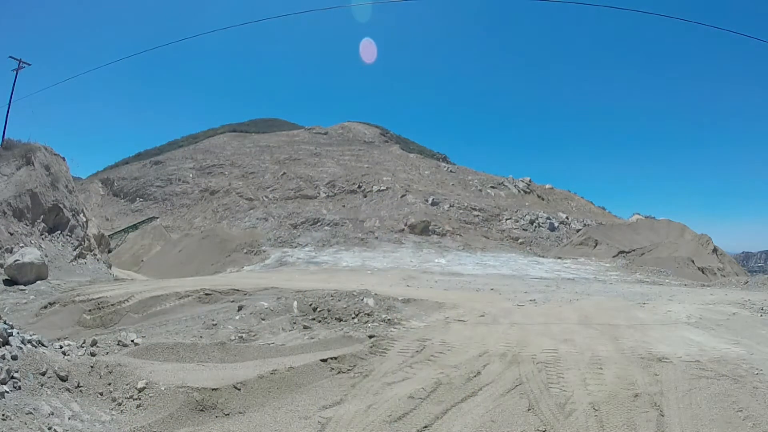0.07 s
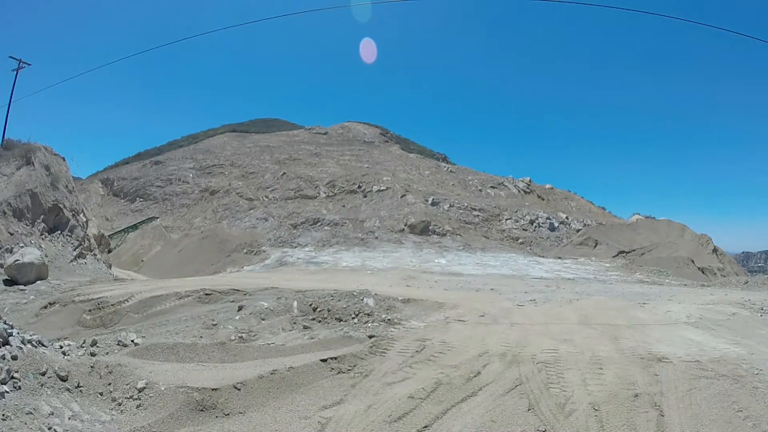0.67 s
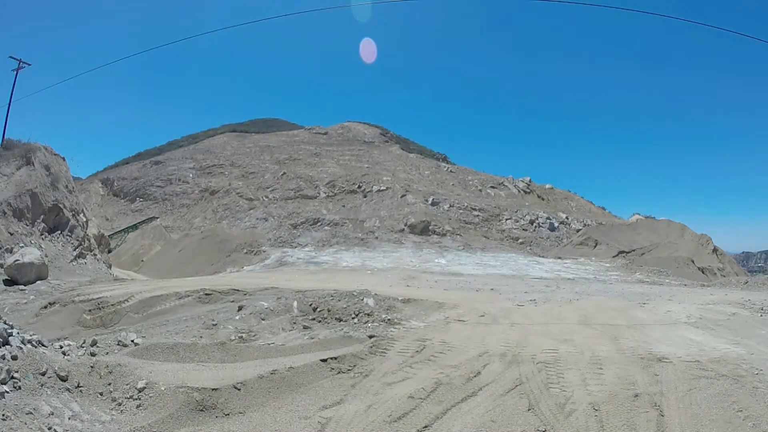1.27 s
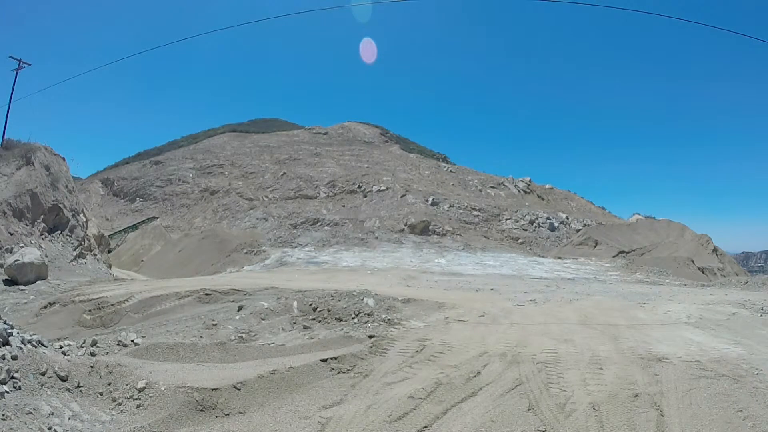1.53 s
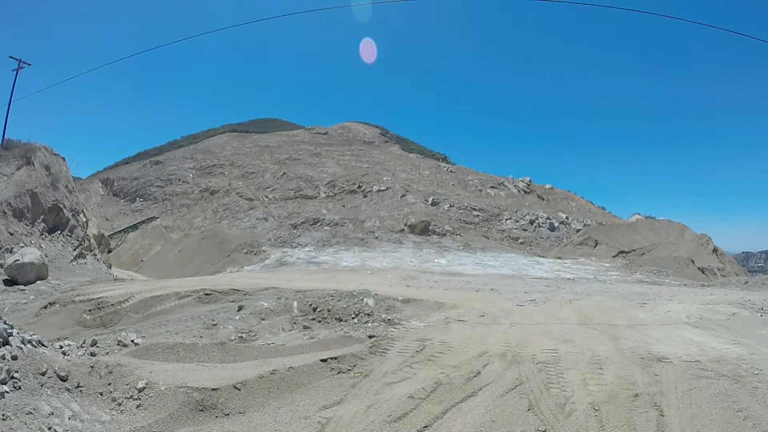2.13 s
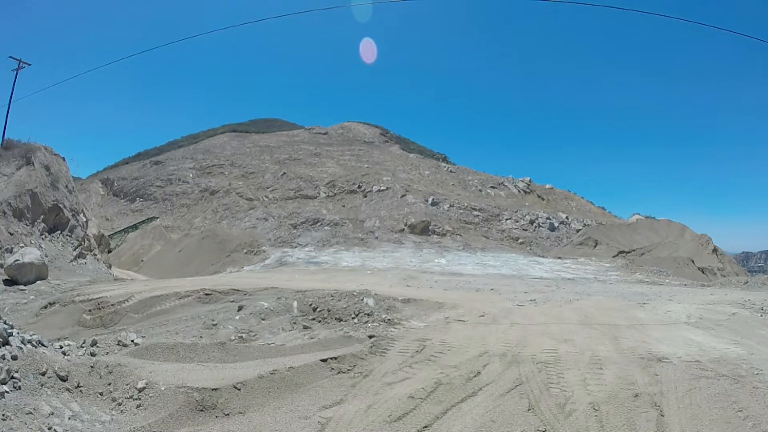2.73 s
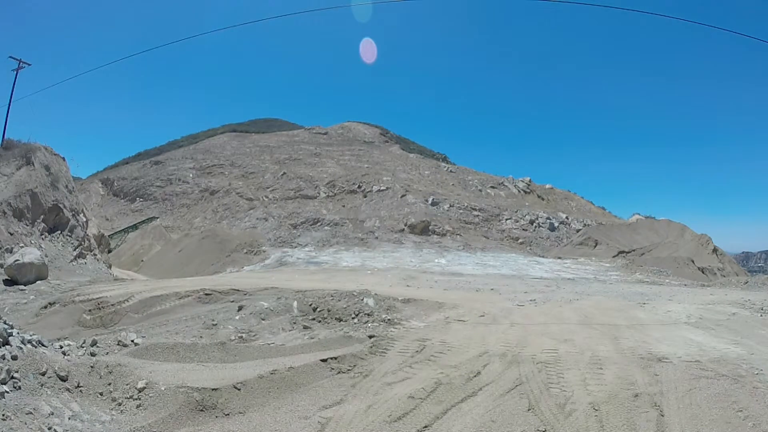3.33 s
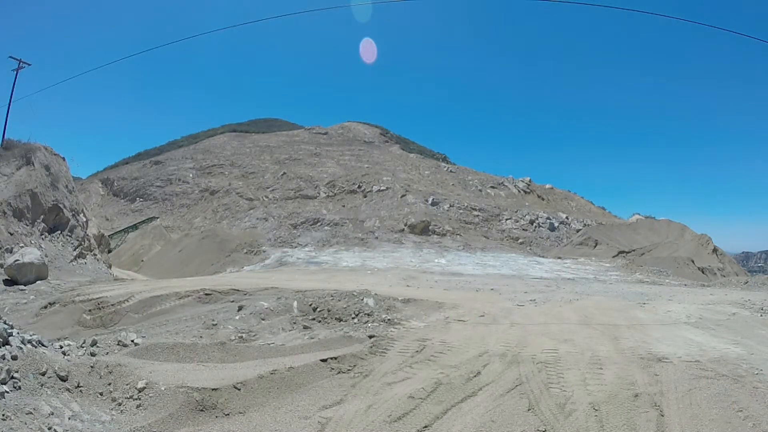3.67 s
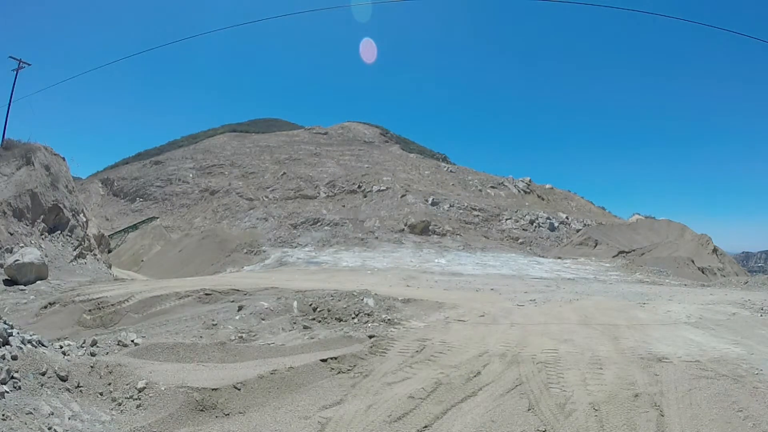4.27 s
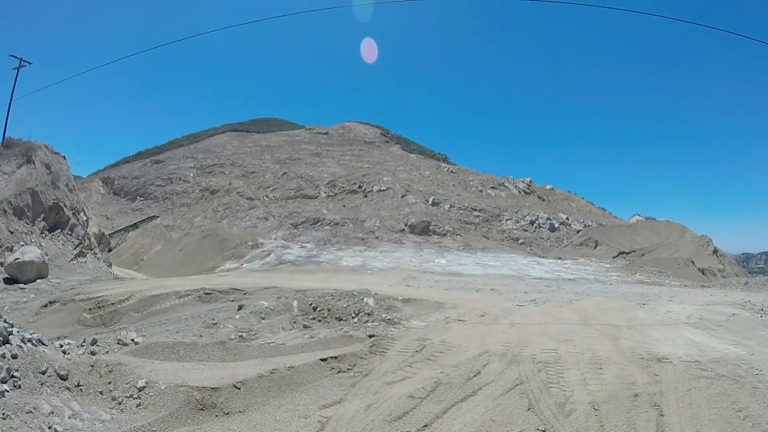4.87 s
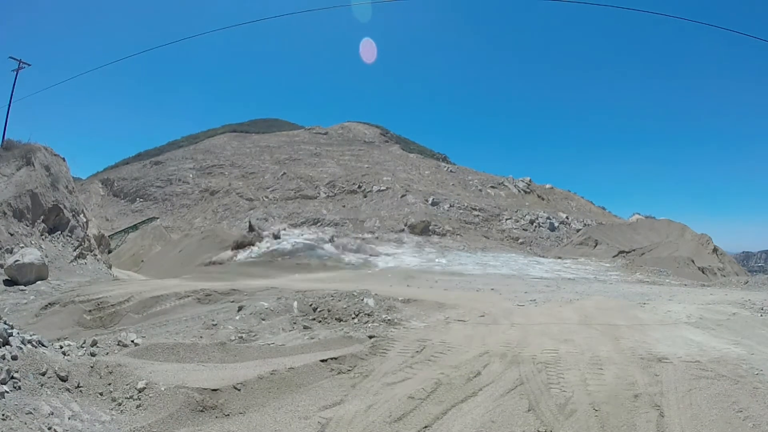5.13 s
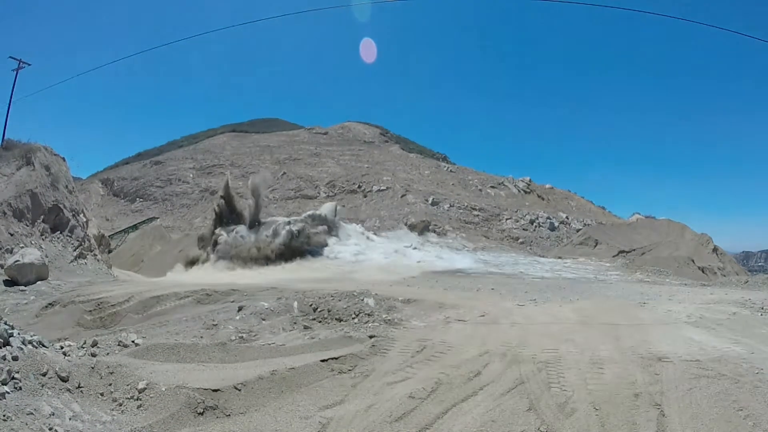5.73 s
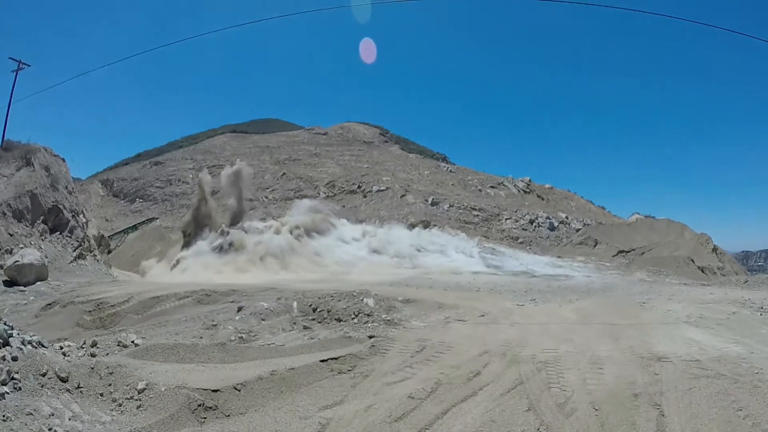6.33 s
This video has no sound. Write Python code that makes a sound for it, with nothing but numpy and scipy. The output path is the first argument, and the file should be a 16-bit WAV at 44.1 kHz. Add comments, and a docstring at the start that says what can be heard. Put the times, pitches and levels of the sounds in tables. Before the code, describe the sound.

After faint outdoor wind, a quarry blast goes off in quick crackling bursts, joined by muffled booms, low rumbling and falling stones.

```python
"""A quarry blast, heard from across the pit through a small camera in a case. First there is only a quiet
breeze. From about 4.2 s, detonators on the surface crack, six rows a second; each sharp jump in air
pressure sets the case ringing, and the pit walls echo. From about 4.8 s, while the cracks go on, the rock
face heaves and buried charges thud. A deep rumble rolls on to the end, with boulders and stones shaken
loose by each charge."""
import sys
import numpy as np
from scipy import signal
from scipy.fft import rfft, irfft, next_fast_len
from scipy.io import wavfile
from scipy.ndimage import uniform_filter1d

SR = 44100
rng = np.random.default_rng(int(sys.argv[2]) if len(sys.argv) > 2 else 0)


def unload_audio(sound):
    """Save the sound as a 16-bit wav file, at the path given as the first command line argument."""
    columns = np.transpose(np.atleast_2d(sound))
    # keep every value between -1 and 1, then stretch to whole-number steps
    steps = np.round(np.clip(columns, -1, 1) * 32767)
    wavfile.write(sys.argv[1], SR, steps.astype(np.int16))


N = 281799
T = np.arange(N) / SR
HEAVE_START_S, HEAVE_RISE_S = 4.778, 0.032

# Levels in all tables are relative: the code shifts them up or down as it mixes.
# The buried charges. Each row: start in seconds, level of the dull thud in dB, of the sharp bite in dB.
CHARGES = [(4.8409, -25.5, -52), (4.8516, -12, -21), (4.8607, -20.5, -25), (4.8748, -11, -23),
           (4.9181, -14, -19), (4.9364, -22.5, -48), (4.9562, -35, -59), (4.967, -23.5, -56),
           (5.0423, -17, -21), (5.0731, -11, -17.5), (5.0813, -31, -42), (5.095, -21.5, -26),
           (5.119, -17.5, -26.5), (5.1286, -16.5, -28), (5.1539, -21, -32), (5.2201, -17.5, -25),
           (5.2851, -27, -59), (5.362, -24, -88), (5.4100, -21.5, -35), (5.4459, -23, -32),
           (5.4651, -27.5, -37), (5.5736, -19.5, -43), (5.651, -30.5, -55), (5.7598, -22, -38),
           (5.8926, -17, -25), (6.095, -11, -29), (6.1006, -15, -26), (6.1167, -27, -48),
           (6.164, -29.5, -59), (6.2611, -18.5, -27), (6.29, -26, -55), (6.3265, -16.5, -33)]
# How strongly the boulders tumble. Each row: time in seconds, level in dB.
TUMBLE_LEVEL = [(4.8, -33), (4.874, -26.5), (5.024, -30), (5.078, -33), (5.148, -31.5), (5.698, -33),
                (5.76, -28.5), (5.826, -39.5), (5.902, -24.5), (6.004, -35), (6.11, -23.5), (6.164, -29),
                (6.288, -22.5), (6.39, -38)]
# The tone of breaking stone. Each row: frequency in Hz, level in dB.
STONE_SPECTRUM = [(500, -9), (1000, 19), (1280, 20), (1600, 20), (2350, 16.5), (3000, -12), (5000, -29),
                  (9000, -128), (15000, -80)]
# The tone of the echo from the pit walls. Each row: frequency in Hz, level in dB.
WALL_SPECTRUM = [(200, -19), (950, -7), (1240, 10.5), (1600, 3.5), (2000, -2.5), (3000, -7), (3550, -3.5),
                 (4000, -3), (4500, -4.5), (5200, -24), (5850, -6.5), (6700, -22), (14000, -47)]


def detonators(snap_db=-3.46, ring_db=-1.0):
    """Each shock gives a bright snap and a slower ring of the case; hard shocks make the case sing."""
    # Four sets of resonances. Each row: frequency in Hz, width in Hz, level in dB.
    bare_modes = [(4140, 690, 5), (7900, 550, -6), (9700, 890, -10), (13400, 1400, -18.5)]  # the shock itself
    quick_modes = [(1985, 1060, 2.5), (2810, 130, -1), (3327, 270, 0), (4590, 420, 6), (5440, 370, -0.5),
                   (5760, 186, 4.5), (7150, 490, -14.5), (10130, 620, -15.5)]  # the snap of the case
    slow_modes = [(1213, 100, -1.5), (1326, 71, 5), (1551, 142, 3), (1900, 1900, -10.5), (444, 1040, -8.5)]  # its ring
    singing_modes = [(1219, 81, 6.5), (1410, 91, -2), (2185, 140, -8), (2740, 60, 1.5), (3400, 170, -7.5),
                     (5875, 220, -2.5)]  # its clear tones
    hard_db, tone_growth, tone_limit_db, fade_db_per_s = -19, 3, -16.5, 11
    out = np.zeros(N)
    for start, snap, ring, bare_db in firing_order():
        shock = pressure_front(scatter=0.6, scatter_s=0.00061, bounce=0.11)
        bare = from_db(bare_db) * resonate(shock, bare_modes)
        add(out, start, snap + snap_db, lowpass(resonate(shock, quick_modes), hz=9900, order=3) + bare)
        push = pressure_front(scatter=0.56, scatter_s=0.0008, bounce=0.24)
        case = lowpass(resonate(push, slow_modes), hz=2340, order=3)
        add(out, start, ring + ring_db, case - 0.44 * lowpass(case, hz=600, order=1))  # thin the bass
        # The clear tones grow faster than the ring, up to a limit, and fade once the face heaves.
        tones = lowpass(resonate(shock, singing_modes), hz=6820, order=4)
        tone_db = min(hard_db + tone_growth * (ring - hard_db), tone_limit_db)
        fade_db = fade_db_per_s * max(start - HEAVE_START_S, 0)
        add(out, start, tone_db + ring_db - fade_db, tones)
    return out


def firing_order(jitter_s=0.0007, snap_spread_db=3, ring_spread_db=1.5):
    """Lists every crack; a row of detonators fires as a quick, nearly even run."""
    # Cracks placed one by one: a few that stand out, and the first two cracks of the row near 4.70 s. Each row:
    # start in seconds, then snap, ring and share of bare shock in dB.
    single_cracks = [(4.2354, -27.5, -32, -8), (4.4002, -20, -20, -7.5), (4.703, -29, -24.5, -9),
                     (4.7090, -22, -22, -9), (5.0426, -17.5, -20, -1.5), (5.5755, -22, -25, -11),
                     (6.0685, -24, -30, -7)]
    # Runs of cracks. Each row: start and length in seconds, number of cracks, snap and ring in dB,
    # then how much the snap and the ring grow from first crack to last in dB.
    rows = [(4.3778, 0.012, 4, -25, -22, 1, -2), (4.5481, .0418, 6, -18, -16.5, 4, 2),
            (4.7148, .0251, 4, -24.5, -18.5, 17.5, 1), (4.8731, .0428, 6, -24.5, -26, -4, 2),
            (5.033, 0.041, 6, -31.5, -28.5, 3.5, -2), (5.204, 0.046, 7, -30, -31.5, 6, 8),
            (5.3734, 0.047, 8, -35.5, -34, 14.5, 21), (5.533, 0.068, 9, -29, -27.5, 1.5, 6.5),
            (5.687, .0605, 9, -28.5, -26, 9, 6), (5.8523, 0.073, 9, -27.5, -25.5, 9.5, 12),
            (6.0215, 0.064, 9, -26.5, -26.5, 4.5, 0), (6.1968, 0.072, 10, -35, -32, 9.5, 12),
            (6.356, 0.033, 5, -37.5, -37, 19, 4)]
    cracks = list(single_cracks)
    for start, length, count, snap, ring, snap_growth, ring_growth in rows:
        bare_db = -12.5 + 2.5 * (start - rows[0][0])  # later rows sound crisper
        chance = rng.standard_normal(size=(20, 3))
        for along, (late, harder, fuller) in zip(np.linspace(0, 1, round(count)), chance):
            crack_s = start + along * length + jitter_s * late * (along > 0)
            snap_db = snap + snap_growth * (along - .5) + snap_spread_db * harder
            ring_db = ring + ring_growth * (along - .5) + ring_spread_db * fuller
            cracks.append((crack_s, snap_db, ring_db, bare_db))
    return cracks


def charges(thud_db=-0.62, bite_db=-5.0, shove_hz=74.3):
    """Rock muffles each charge; the escaping gas bites, then shoves the air in one heavy swing."""
    # Two sets of resonances. Each row: frequency in Hz, width in Hz, level in dB.
    thud_modes = [(255, 70, 7), (650, 170, -0.5), (1263, 156, 2), (1780, 147, 3), (2135, 260, -0.5)]  # the charge under the rock
    bite_modes = [(2500, 150, 8), (2750, 330, 1.5), (3220, 300, -7.5), (4350, 1500, -43), (8250, 3300, -37)]  # the gas bursting through
    out, t = np.zeros(N), T[:SR // 8]
    shove = np.cos(2 * np.pi * shove_hz * t) * np.exp(-t / 0.0085) * (1 - np.exp(-t / 0.0015))
    for start, thud, bite in CHARGES:
        shock = pressure_front(scatter=1.0, scatter_s=0.0015, bounce=0.024)
        add(out, start, thud + thud_db, lowpass(resonate(shock, thud_modes), hz=2410, order=6))
        add(out, start, bite + bite_db, lowpass(resonate(shock, bite_modes), hz=5700, order=2))
        add(out, start, thud, shove)
    return out


def pressure_front(scatter, scatter_s, bounce):
    """A jump in air pressure, its bounce off the ground and its dying scatter off loose stones."""
    t = T[:SR // 20]
    scattered = rms_one(rng.standard_normal(len(t)) * t * np.exp(-t / scatter_s))
    pulse = scatter * scattered / np.sqrt(len(t))
    pulse[0] += 1
    pulse[int(rng.uniform(.0004, .0009) * SR)] += bounce
    return pulse


def rumble(swell_db=2.5, boom_db=0.5):
    """The heaving rock face pumps the air in deep swells, with a boom above them."""
    # The tone of the swell and of the boom. Each row: frequency in Hz, level in dB.
    swell_spectrum = [(16, -13), (22, 6), (32, -30), (44, -9), (56, 4.5), (70, -9), (90, -37), (150, -43)]
    boom_spectrum = [(55, -17.5), (74, -9), (91, 2), (110, -10.5), (135, -20.5), (220, -41)]
    # How they rise and fall. Each row: time in seconds, level in dB.
    swell_level = [(4.78, -35), (4.828, -21.5), (4.918, -18.5), (4.95, -26), (5.07, -15), (5.11, -31),
                   (5.222, -22), (5.25, -30.5), (5.438, -21.5), (5.46, -32), (5.578, -17), (5.69, -32),
                   (5.748, -13.5), (5.928, -28.5), (6.08, -12.5), (6.146, -26.5), (6.344, -19), (6.39, -25)]
    boom_level = [(4.78, -22), (4.81, -22), (4.868, -11), (4.994, -37), (5.142, -18.5), (5.2, -32),
                  (5.228, -14.5), (5.29, -41), (5.336, -22.5), (5.55, -25.5), (5.572, -22.5),
                  (5.788, -25.5), (5.842, -30), (5.864, -23), (6.124, -17.5), (6.152, -24), (6.348, -19.5),
                  (6.39, -27)]
    swell = from_db(swell_db) * gain_curve(swell_level) * rolling(swell_spectrum, evenness=0.64)
    boom = from_db(boom_db) * gain_curve(boom_level) * rolling(boom_spectrum, evenness=0.53)
    return heaving() * (swell + boom)


def boulders(heave_db=-2.0, shaken_db=-6.5):
    """Boulders tumble as the face moves and after each charge."""
    # The tone of tumbling boulders. Each row: frequency in Hz, level in dB.
    tumble_spectrum = [(135, -46), (170, -10), (209, 0.5), (256, -10), (325, -10.5), (385, -19),
                       (470, -20.5), (590, -18.5), (900, -27.5), (1400, -55)]
    heaved = from_db(heave_db) * heaving() * gain_curve(TUMBLE_LEVEL)
    shaken = from_db(shaken_db) * shaking(settle_s=0.015)
    return np.hypot(heaved, shaken) * rolling(tumble_spectrum, evenness=0.45)


def gravel(knocks_per_s=400, size_db=6.0, heave_db=-48.5, shaken_db=-22.5, tumble_db=-31.0, growth=1.7):
    """Many small knocks of breaking stone; they swell faster than the boulders that grind them."""
    knocks = (rng.random(N) < knocks_per_s / SR) * rng.choice([-1, 1], N)
    sizes = from_db(size_db * np.minimum(rng.exponential(1, N), 3))
    grinding = from_db(heave_db) * heaving() * (gain_curve(TUMBLE_LEVEL) / from_db(tumble_db)) ** growth
    shaken = from_db(shaken_db) * shaking(settle_s=0.03)
    return np.hypot(grinding, shaken) * colour(knocks * sizes, STONE_SPECTRUM)


def heaving():
    """The rock face gathers speed, from 0 (at rest) to 1 (in full motion)."""
    return np.clip((T - HEAVE_START_S) / HEAVE_RISE_S, 0, 1) ** 2


def shaking(settle_s, rise_s=0.0012):
    """How much the loose stone moves: each charge jolts it, and then it settles."""
    jolts = np.zeros(N)
    for start, thud, _ in CHARGES:
        jolts[round(start * SR)] += from_db(thud) ** 2
    energy = signal.lfilter([1], [1, -np.exp(-2 / (settle_s * SR))], jolts + 1e-18)
    return smooth(np.sqrt(energy), rise_s)


def pit_reflections(cracks, thuds):
    """Nearby rubble throws back a short, bright scatter; the far walls add a faint tail."""
    # The tone of the scatter from the rubble. Each row: frequency in Hz, level in dB.
    rubble_spectrum = [(300, -23), (1000, -7.5), (1240, 7), (1600, -0.5), (2100, -0.5), (3000, -4.5),
                       (3500, -5.5), (5900, -12.5), (6900, -17), (10500, -33), (14500, -38)]
    near = tail(cracks, rubble_spectrum, db=-7.5, decay_s=0.007)
    near += tail(thuds, STONE_SPECTRUM, db=-23.0, decay_s=0.019)
    return near + tail(cracks, WALL_SPECTRUM, db=-26.0, decay_s=0.021)


def tail(x, spectrum, db, decay_s):
    """Many blurred reflections: the sound's energy is stored and leaks back as noise."""
    stored = smooth(x ** 2 + 1e-18, decay_s)
    return from_db(db) * np.sqrt(stored) * noise(spectrum)


def wall_echoes():
    """Rough walls smear the cracks into brief swells of hiss."""
    # Sound thrown back by the walls. Each row: time of the peak in seconds, level in dB, spread in seconds.
    echoes = [(4.425, -34, 0.0099), (4.474, -32, 0.02), (4.65, -43, 0.1), (4.83, -43.5, 0.035)]
    swells = sum(from_db(db) * np.exp(-.5 * ((T - peak) / spread) ** 2) for peak, db, spread in echoes)
    return noise(WALL_SPECTRUM) * swells


def open_air(hush_db=-52.5, wind_db=-0.5):
    """A steady, distant hush and a light breeze on the microphone."""
    # The tone of the hush and of the breeze. Each row: frequency in Hz, level in dB.
    hush_spectrum = [(18, -23), (30, 0.5), (80, -1), (180, -2.5), (215, -2.5), (252, -4), (401, -7),
                     (674, -11), (1050, -14), (2170, -19.5), (5230, -27.5), (12000, -40), (14800, -43)]
    wind_spectrum = [(12, -33), (20, -1), (65, -3), (104, -3.5), (150, -18), (200, -21), (260, -31),
                     (440, -120)]
    # How the breeze rises and falls. Each row: time in seconds, level in dB.
    wind_level = [(0.0, -58), (1.84, -59.5), (2.08, -48.5), (3.08, -53.5), (3.1, -50), (4.28, -49.5),
                  (4.54, -44.5), (4.7, -82)]
    hush = from_db(hush_db) * noise(hush_spectrum)
    return hush + from_db(wind_db) * gain_curve(wind_level) * noise(wind_spectrum)


def rolling(spectrum, evenness):
    """Low noise whose swings are evened out in height."""
    swing = noise(spectrum)
    height = np.abs(signal.hilbert(swing, next_fast_len(N))[:N])
    power = uniform_filter1d(height ** 2, size=SR // 50)
    return rms_one(swing / (power + 0.13) ** (evenness / 2))


def noise(spectrum):
    """Steady noise with the given tone."""
    return colour(rng.standard_normal(N), spectrum)


def colour(x, spectrum):
    """Shapes the lows and highs of a sound to follow a spectrum, at an average level of 1."""
    size = next_fast_len(len(x))
    hz, db = np.transpose(spectrum)
    freqs = np.maximum(np.arange(size // 2 + 1) * SR / size, 1)
    gain = from_db(np.interp(np.log(freqs), np.log(hz), db))
    edge_fade = np.minimum(1, freqs / hz[0]) ** 3 * np.minimum(1, hz[-1] / freqs) ** 4
    return rms_one(irfft(rfft(x, size) * gain * edge_fade, size)[:len(x)])


def resonate(x, modes):
    """Lets a sound ring at several pitches, added with alternating signs; narrow ones ring longer."""
    out = 0
    for k, (hz, width, db) in enumerate(modes):
        decay = np.exp(-np.pi * width / SR)
        feed = np.array([1, 0, -1]) * (1 - decay * decay) / 2
        feedback = [1, -2 * decay * np.cos(2 * np.pi * hz / SR), decay * decay]
        out = out + (-1) ** k * from_db(db) * signal.lfilter(feed, feedback, x)
    return out


def add(out, start_s, db, sound):
    """Mixes a sound in, with as much energy as 5 ms at the given level."""
    i = min(round(start_s * SR), N - 1)
    sound = sound * from_db(db) / np.sqrt(np.sum(sound ** 2) / (SR / 200))
    out[i:i + len(sound)] += sound[:N - i]


def lowpass(x, hz, order):
    """Takes off the treble above hz; a higher order cuts more steeply."""
    return signal.sosfilt(signal.butter(order, hz, fs=SR, output="sos"), x)


def smooth(x, lag_s):
    """Follows a signal slowly, rounding off its jumps."""
    keep = np.exp(-1 / (lag_s * SR))
    return signal.lfilter([1 - keep], [1, -keep], x)


def gain_curve(rows):
    """Joins points of time and level into a volume curve."""
    return from_db(np.interp(T, *np.transpose(rows)))


def from_db(db):
    """Turns decibels into a factor to multiply by."""
    return 10 ** (np.asarray(db) / 20)


def rms_one(x):
    """Scales a sound to an average (rms) level of 1."""
    return x / np.sqrt(np.mean(x ** 2) + 1e-20)


def scene():
    """Cracks and charges with their echoes, the moving rock and the open air, in one channel."""
    cracks, thuds = detonators(), charges()
    blast = cracks + thuds + pit_reflections(cracks, thuds) + wall_echoes()
    return (blast + rumble() + boulders() + gravel() + open_air())[None]


def record(dry, peak_limit=0.92, cutoff_hz=15000):
    """The tallest peaks are flattened; the highest treble fades and is then cut off."""
    faded = lowpass(np.clip(dry, -peak_limit, peak_limit), hz=14300, order=8)
    return signal.sosfilt(signal.ellip(10, .2, 80, cutoff_hz, fs=SR, output="sos"), faded)


dry = scene()
out = record(dry)
unload_audio(out)
```